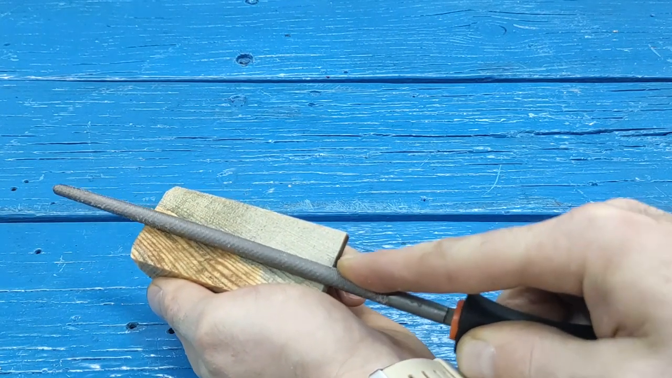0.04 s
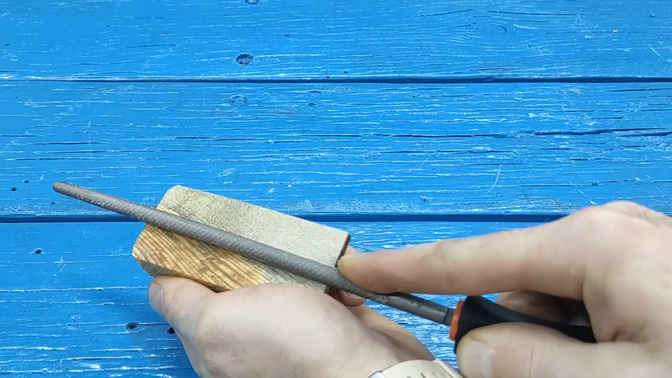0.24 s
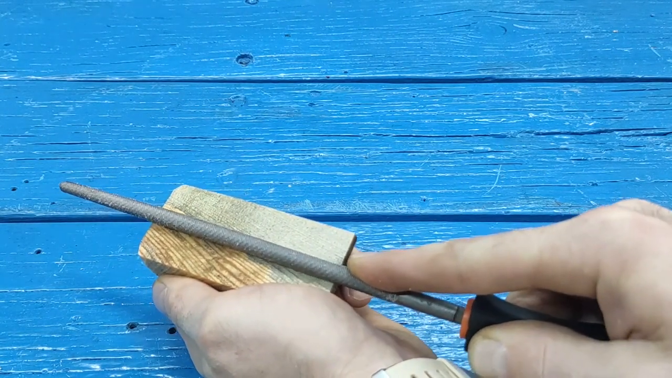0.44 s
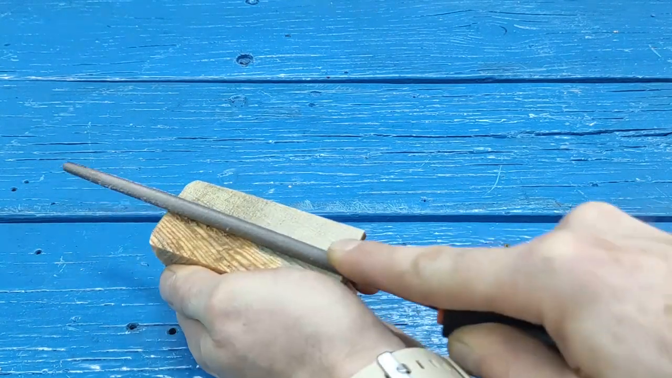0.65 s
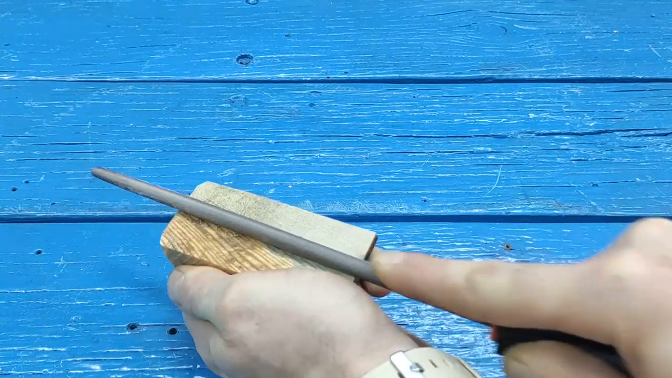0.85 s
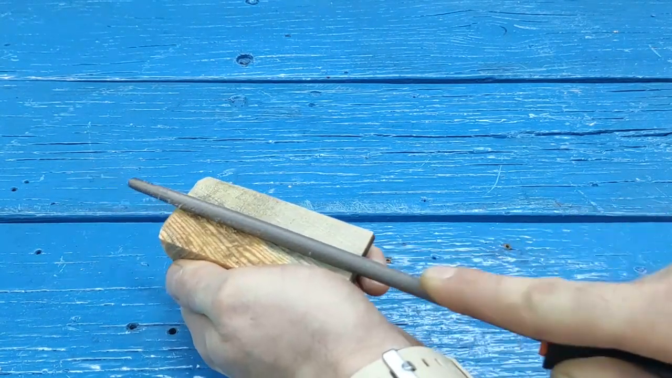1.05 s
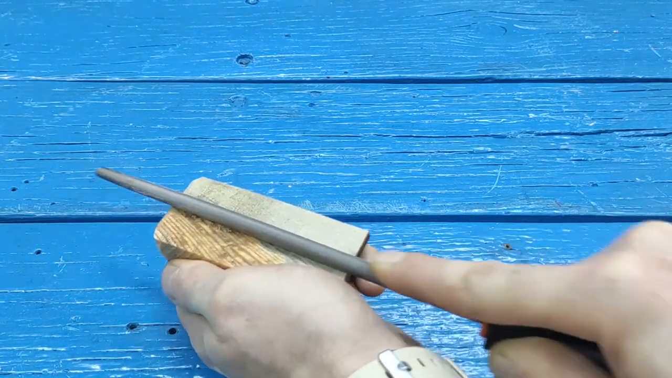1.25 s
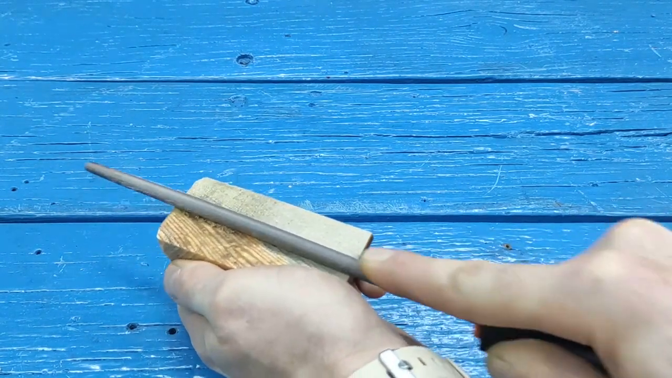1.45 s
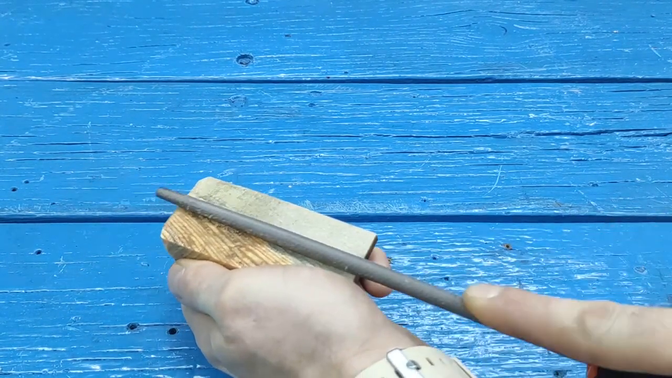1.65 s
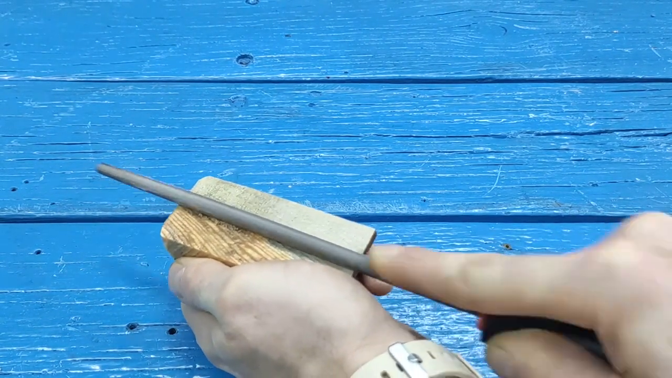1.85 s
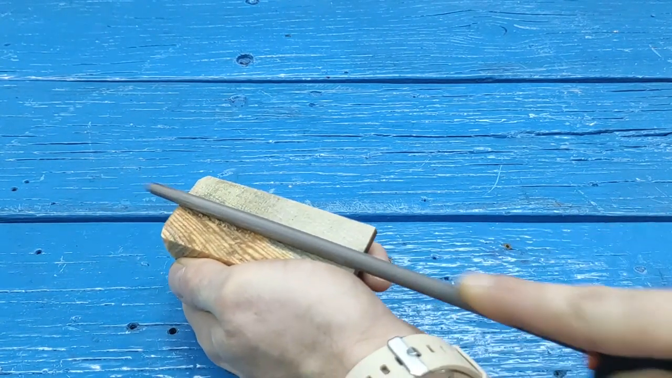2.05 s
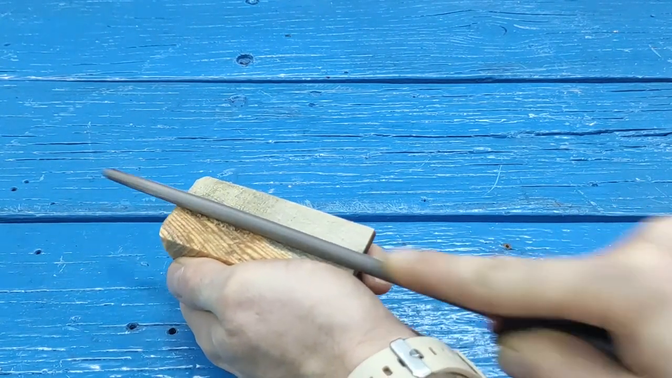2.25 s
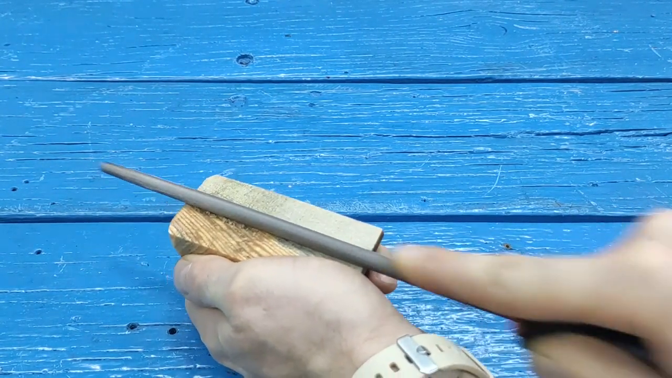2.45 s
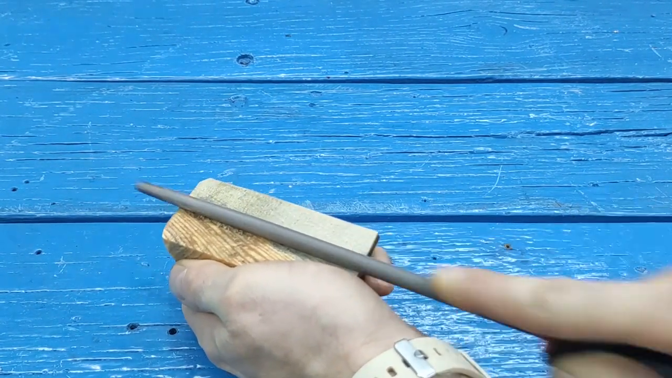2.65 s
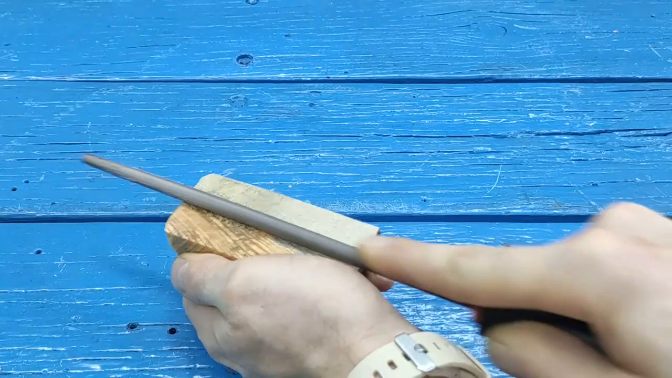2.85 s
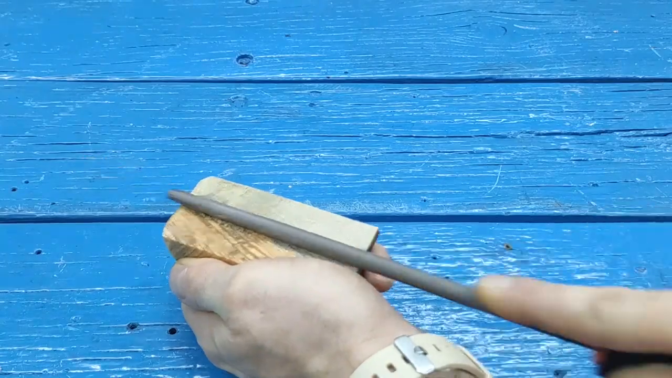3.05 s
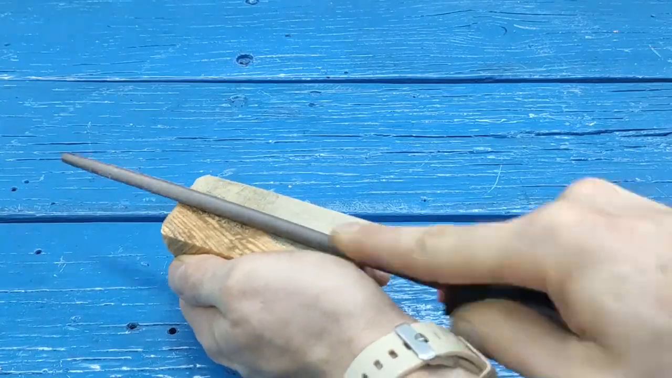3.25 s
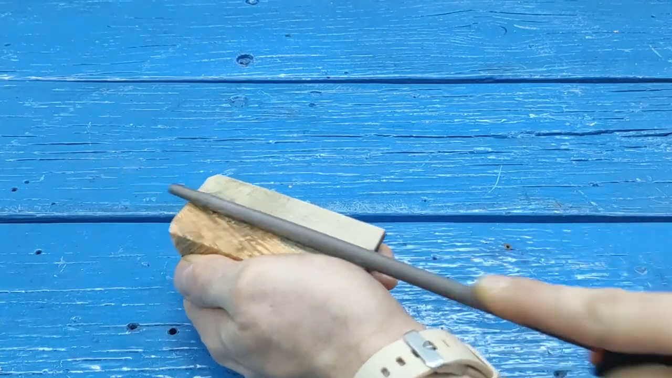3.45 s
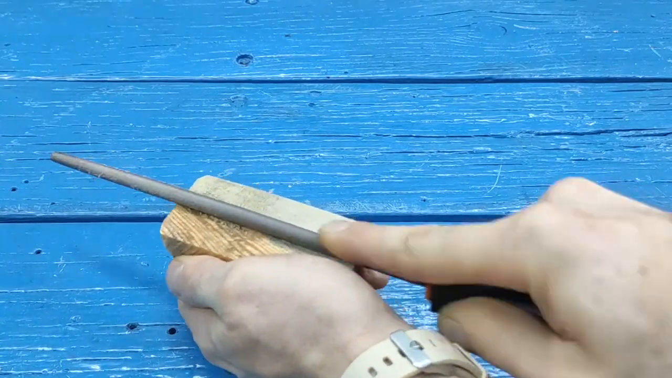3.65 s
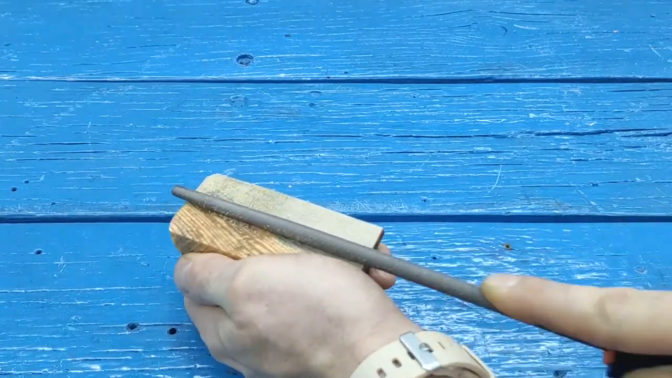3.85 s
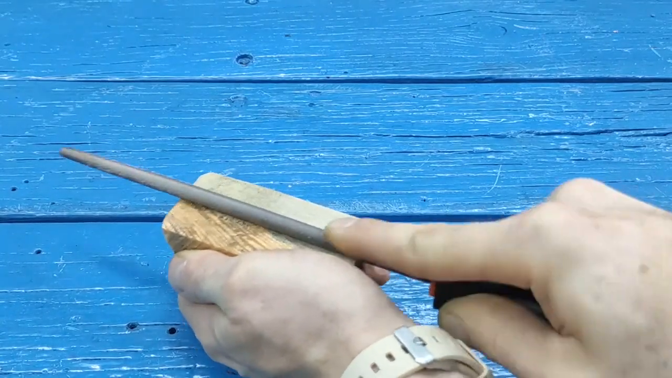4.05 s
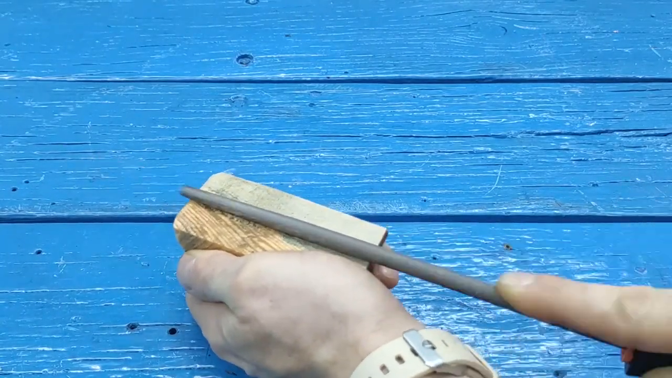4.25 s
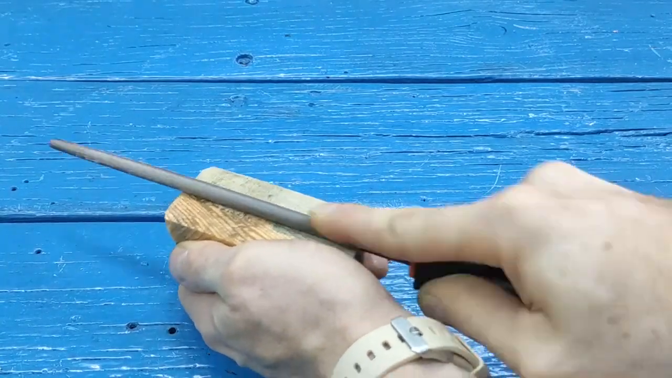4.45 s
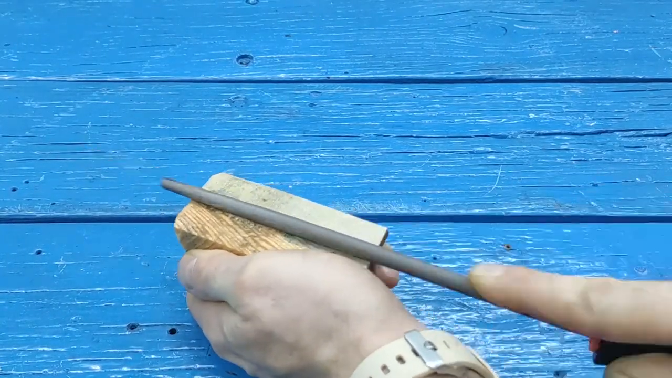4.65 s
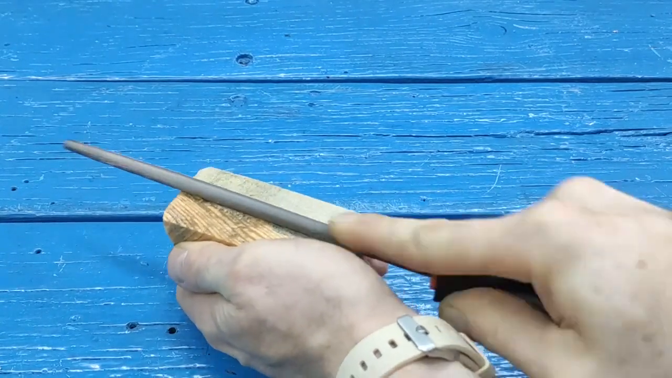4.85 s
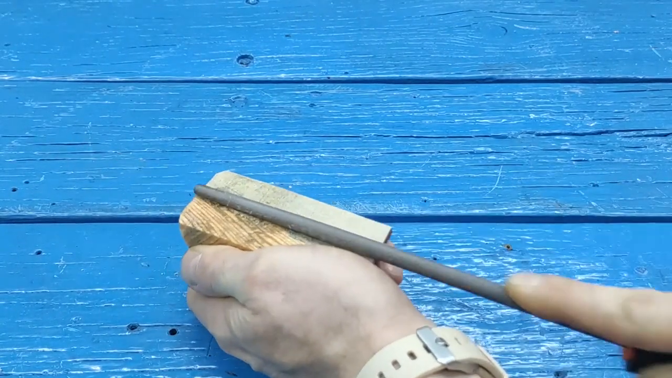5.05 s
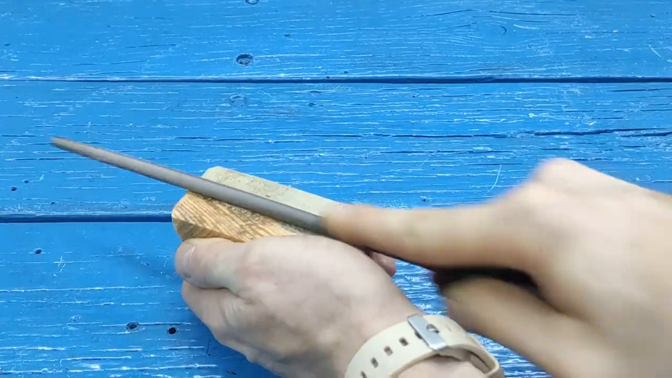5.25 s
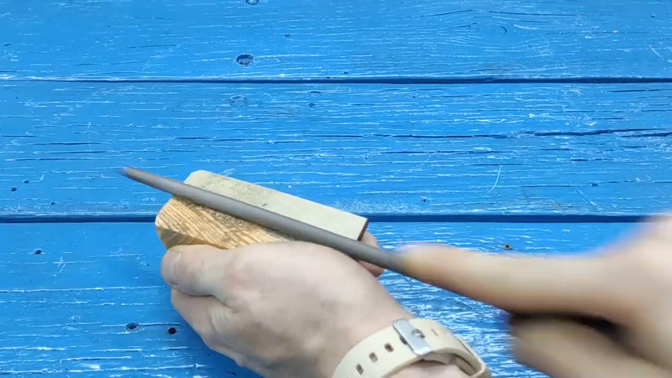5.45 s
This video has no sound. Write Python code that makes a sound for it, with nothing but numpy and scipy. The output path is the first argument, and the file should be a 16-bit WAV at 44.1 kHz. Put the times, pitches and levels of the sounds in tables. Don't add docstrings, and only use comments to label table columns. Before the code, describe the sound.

The first half second is nearly silent: at about 0.1 s a thin, bright steel click and short slide on wood, at 0.2 s a compact woody knock, and near 0.47 s a tiny gritty tick. From about 0.57 s a round file rasps on a hand-held wooden block. The first strokes are hesitant and jerky, about six cycles a second, with weaker pulls and clearly louder pushes. A dull low thump falls at 1.6 s. By 2 s the filing is smooth and regular, just over seven cycles a second. From roughly 2.4 s a rough, arching tooth tone, rising and falling with hand speed, colours many strokes. The rasp is strongest from 4 s and continues to the cut-off at 5.5 s. Low jolts mark every turn, with palm rub and hand rumble beneath. The sound is close, stereo and dry, with faint air noise and short room decay.

```python
import sys
import numpy as np
from scipy import signal
from scipy.fft import rfft, irfft, next_fast_len
from scipy.io import wavfile
from scipy.ndimage import uniform_filter1d, map_coordinates

SR = 44100
rng = np.random.default_rng(int(sys.argv[2]) if len(sys.argv) > 2 else 0)


def waveform_to_disk(signal):
    frames = np.transpose(np.atleast_2d(signal))
    scaled = np.clip(frames, -1, 1) * 32767
    samples = np.round(scaled).astype(np.int16)
    wavfile.write(sys.argv[1], SR, samples)


def voltage_ratio(level):
    return 10 ** (np.asarray(level, float) / 20)


N = 242991

# hz, level_db_per_hz
AIR_TONE = [(25, 5), (60, -12), (200, -29), (600, -16.5), (2000, -22.5), (5000, -21), (8000, -16.5),
            (12000, -13.5), (15800, -17.5)]
# time_s, level_db
AIR_LEVEL = [(0, -92), (.06, -89.5), (.12, -86), (.24, -80), (.3, -90.5), (.45, -91), (.5, -86.5),
             (.6, -78), (5.51, -64.5)]
# hz, t60_s
ROOM_DECAY = [(300, 0.92), (3000, 0.27), (12000, 0.13)]
# hz, likeness_0_1
PORT_LIKENESS = [(60, 0.75), (130, 0.65), (290, 0.63), (640, 0.29), (1410, 0.73), (3100, 0.767),
                 (4700, 0.74), (6820, 0.997), (15000, 0.49)]
# hz, left_minus_right_db
PORT_LEAN = [(60, 6), (110, -1.5), (200, 0.5), (380, -1.5), (700, 2), (1290, -3.5), (2380, -2),
             (4400, -2.5), (8120, -4), (15000, -1)]
# hz, lead_rad
PORT_LEAD = [(0, 0.27), (1550, -0.493), (2580, -0.88), (3360, -0.87), (3790, -1.16), (5250, 1.46),
             (6980, 0.84), (15600, -0.19)]

# hz, level_db_per_hz
HANDS_TONE = [(15, -6), (28, 3.5), (60, -6), (150, -4.5), (240, -12), (283, -10.5), (360, -19), (500, -44),
              (800, -53)]
# hz, level_db_per_hz
PALM_TONE = [(250, -24), (400, -8.5), (700, -3.5), (1150, 3.5), (1500, -1), (2000, -43)]
# time_s, level_db
STILL_HANDS = [(0.0, -82), (0.18, -99), (0.21, -88), (0.41, -109), (0.6, -89)]
# time_s, level_db
PALM_SETTLES = [(0, -86.5), (.06, -93), (.1, -104), (.45, -110)]
# peak_s, rumble_db, palm_db
GRIP_SHIFTS = [(0.591, -81, -76.5), (0.681, -78, -65.5), (.86, -82, -72.5), (1.1, -87, -76.5),
               (1.18, -83.5, -65.5), (1.33, -72.5, -71), (1.49, -84, -71), (1.56, -80, -73),
               (1.63, -65, -65.5), (2.34, -75, -72), (2.48, -69, -74.5), (3.33, -63.5, -89),
               (3.58, -71, -66), (3.69, -77, -77), (4.08, -65, -66), (4.36, -60.5, -69), (5.22, -74, -85.5),
               (5.28, -75.5, -85.5)]
# time_s, level_db
EFFORT = [(0.57, -35), (0.645, -27), (0.733, -8), (1.2, -5), (1.5, -6), (2.0, -1.5), (2.9, -0.58),
          (3.5, -1.5), (3.9, 4), (4.6, 1.48), (5.5, 3)]

# hz, level_db_per_hz
SLIDE_TONE = [(1500, -45), (2500, -25), (4500, -12), (6700, 0.5), (8500, -7.5), (12500, -31), (15000, -4),
              (15900, 1)]
# peak_s, peak_db, rise_s, fall_s (20 dB)
SLIDES = [
    (.112, -52.5, .022, .03),
    (.15, -83, .03, .12),
    (.216, -83, .02, 0.1),
    (.474, -87, .018, 0.64),
]
# start_s, peak_db, pitch_hz, t60_s, blur_hz
TAPS = [(.108, -59, 6720, 0.13, 60), (.085, -66, 15200, .15, 500), (0.214, -40.5, 684, 0.035, 1),
        (.193, -74, 700, 0.1, 40), (.1, -84, 520, 0.18, 20), (.216, -69, 12300, .06, 1800),
        (.245, -67.5, 700, 0.071, 15), (.472, -62, 12000, .006, 1900), (1.164, -51, 166, 0.052, 3),
        (1.32, -64, 150, .06, 12), (1.612, -38.5, 154, 0.072, 3), (2.2, -56.5, 410, .05, 12)]

# pull_s, push_s, pull_db, push_db
CYCLES = [(0.567, 0.661, -51, -43.5), (0.74, 0.827, -50.5, -44), (0.905, 0.988, -49, -41.5),
          (1.063, 1.14, -46.5, -41), (1.221, 1.296, -44, -39.5), (1.368, 1.454, -48, -39),
          (1.521, 1.609, -45.5, -38.5), (1.676, 1.748, -45, -37.5), (1.823, 1.892, -45, -37),
          (1.958, 2.02, -45, -37.5),
          (2.091, 2.156, -45, -36.5), (2.232, 2.297, -44, -35.5), (2.37, 2.44, -46, -35.5),
               (2.514, 2.579, -44.5, -36), (2.648, 2.715, -45.5, -35), (2.787, 2.852, -47, -36),
               (2.924, 2.989, -45, -37), (3.061, 3.129, -43, -36), (3.199, 3.264, -44, -35.5),
               (3.338, 3.401, -42, -35.5), (3.47, 3.53, -44, -35), (3.601, 3.666, -43, -34.5),
               (3.736, 3.806, -44.5, -35), (3.876, 3.939, -43, -33.5), (4.013, 4.076, -40.5, -31),
               (4.147, 4.211, -41, -29), (4.284, 4.342, -40.5, -31.5), (4.414, 4.476, -40, -32),
               (4.546, 4.612, -42.5, -31.5), (4.678, 4.744, -40.5, -32), (4.814, 4.874, -38.5, -32.5),
               (4.945, 5.003, -39.5, -32.5), (5.078, 5.134, -38.5, -30), (5.203, 5.262, -40.5, -31.5),
               (5.329, 5.388, -40, -32), (5.451, 5.516, -39.5, -33)]
# time_s, pull_jerkiness, push_jerkiness, pull_top_speed_place_0_1, push_top_speed_place_0_1
MOTION = [(0.56, 6.8, 6.3, 0.35, 0.33), (0.8, 3.8, 4.4, 0.52, 0.42), (1.1, 4.9, 5, 0.44, 0.47),
          (1.38, 5.5, 3.9, .47, 0.48), (1.7, 2.9, 3.4, 0.42, 0.46), (2.05, 1.01, 2.3, 0.46, .48),
          (2.6, 1.3, 2.66, 0.48, 0.49), (3.4, 1.1, 1.93, 0.45, 0.53), (3.9, 1.2, 2.04, .49, .52),
          (4.22, 1.2, 3.66, 0.49, 0.45), (4.38, 1.32, 1.6, 0.44, 0.52), (5.5, 0.95, 1.96, 0.37, 0.49)]
# time_s, level_db
FREE_STEEL = [(0.56, -9), (0.75, 4), (1.0, -6), (1.13, -12), (1.37, 8.5), (1.68, 2.5), (2.0, 5),
              (2.12, -5.5), (2.43, 7), (2.75, 8.5), (3.0, 7), (3.27, 7.5), (3.45, -5), (3.68, -4), (3.8, 2),
              (4.2, -10), (4.5, -10.5), (5.3, 7.5)]
# start_s, top_rate_hz, level_re_stroke_db
EVEN_TEETH = [(2.373, 2700, -15), (2.438, 2770, -20), (2.577, 3010, -31.5), (2.989, 3270, -14.5),
              (3.128, 3430, -22), (3.338, 2680, -15), (3.471, 2557, -13.5), (3.531, 1994, -15),
              (3.602, 2035, -29), (3.665, 2218, -11), (3.738, 2102, -13), (3.804, 2044, -19.5),
              (3.875, 2071, -12.5), (3.938, 2282, -18), (4.012, 2417, -8), (4.076, 2435, -8.5),
              (4.148, 2460, -10), (4.21, 2660, -15), (4.475, 2650, -24.5), (4.609, 2868, -18.5),
              (4.741, 3180, -21.5), (4.812, 2950, -15), (4.876, 2583, -15), (4.945, 2667, -20.5),
              (5.003, 3037, -14), (5.134, 3394, -26.5), (5.386, 3000, -29.5)]
# hz, level_db_per_hz
PULL_TONE = [(240, -39), (400, -57), (1020, -28), (1480, -12), (2460, 1.5), (3240, -1), (3840, 3),
             (5300, -1.5), (6680, -13), (7670, -4.5), (8410, -11.5), (10100, -8), (11600, -14.5),
             (13100, -3), (15800, -15)]
# hz, level_db_per_hz
PUSH_TONE = [(240, -52.5), (400, -29), (837, -37), (1650, -22), (2610, -4), (3090, -2.5), (3900, -1.5),
             (4270, -6), (5220, -4), (6090, -12), (7790, -6), (8670, -9), (11600, -12), (13800, -7),
             (15800, -12)]
# pitch_hz, width_hz, level_re_fibres_db
BODY_MODES = [(1505, 50, 0), (2430, 90, -6), (3835, 90, 1), (4100, 130, -4), (5180, 200, -6),
              (7750, 220, -5), (9880, 250, -7)]

RUMBLE_DB, RUMBLE_PER_EFFORT_DB = -73, 0.62
PALM_DB, PALM_PER_EFFORT_DB = -73, 0.336
SHIFT_RISE_S, SHIFT_FALL_S = 0.024, 0.036
BLOCK_HZ, BLOCK_WIDTH_HZ, BLOCK_DB = 281, 12, 5
KNOCK_PAN_DB, TICK_PAN_DB = 4.5, 1
JOLT_DB, JOLT_SCATTER_DB = -41.5, 2.5
JOLT_LAG_S = (0.0023, 0.0071)
TREBLE_DB, TREBLE_LOSS_DB = (-2.5, -5), (0.5, 1.19)
STEEL_MODE = 2


def unit(x):
    return x / np.sqrt(np.mean(x ** 2) + 1e-20)


def along(points, hz):
    f, v = np.transpose(points)
    return np.interp(np.log(hz + 1), np.log(f + 1), v)


def curve(rows):
    return np.interp(np.arange(N) / SR, *np.transpose(rows))


def wobble(rate_hz):
    knots = rng.standard_normal(int(N * rate_hz / SR) + 4)
    return map_coordinates(knots, [np.arange(N) * rate_hz / SR])


def swells(rows):
    t = np.arange(N) / SR
    return sum(voltage_ratio(db - 20 * np.maximum((s - t) / rise_s, (t - s) / fall_s)) for s, db, rise_s, fall_s in rows)


def filtered(x, response):
    m = next_fast_len(N + SR // 2)
    return irfft(rfft(x, m) * response(np.fft.rfftfreq(m, 1 / SR)), m)[..., :N]


def ringing(x, hz, width_hz):
    b, a = signal.iirpeak(hz, hz / width_hz, SR)
    return signal.lfilter(b, a, x)


def noise(tone):
    return unit(filtered(rng.standard_normal((2, N)), lambda hz: voltage_ratio(along(tone, hz))))


def patchy(x, depth_db):
    z = signal.stft(x, nperseg=256)[2]
    field = uniform_filter1d(rng.standard_normal(z.shape[-2:]), size=2, axis=0)
    field = uniform_filter1d(field, size=4, axis=1)
    return signal.istft(z * voltage_ratio(depth_db * unit(field)), nperseg=256)[1][..., :N]


def ports(pair):
    def turn(hz):
        return np.arccos(np.clip(along(PORT_LIKENESS, hz), 0, 1)) / 2

    def half(hz):
        return voltage_ratio(along(PORT_LEAN, hz) / 2) * np.exp(0.5j * along(PORT_LEAD, hz))

    mid, side = filtered(pair, lambda hz: np.array([np.cos(turn(hz)), np.sin(turn(hz))]))
    return filtered(np.array([mid + side, mid - side]), lambda hz: np.array([half(hz), 1 / half(hz)]))


def air():
    return voltage_ratio(curve(AIR_LEVEL)) * ports(patchy(noise(AIR_TONE), depth_db=3.5))


def shop(x):
    hz, t, z = signal.stft(rng.standard_normal((2, SR // 3)), SR, nperseg=256)
    decay = voltage_ratio(-60 * t / along(ROOM_DECAY, hz)[:, None])
    tail = signal.istft(z * decay, SR, nperseg=256)[1]
    late = np.pad(x, ((0, 0), (300, 0)))
    return signal.fftconvolve(late, tail / np.linalg.norm(tail[0]), axes=1)[:, :N]


def strokes():
    cycles = np.array(CYCLES)
    start, db = cycles[:, :2].ravel(), cycles[:, 2:].ravel()
    way = np.arange(len(start)) % 2
    s, *motion = np.transpose(MOTION)
    pull_jerk, push_jerk, pull_top, push_top = [np.interp(start, s, column) for column in motion]
    jerk = np.choose(way, [pull_jerk, push_jerk])
    top = np.choose(way, [pull_top, push_top])
    treble_db = np.take(TREBLE_DB, way) - np.take(TREBLE_LOSS_DB, way) * jerk
    steel_db = np.interp(start, *np.transpose(FREE_STEEL))
    return np.array([start, db, top, jerk, treble_db, steel_db])


def hand():
    start, _, top = strokes()[:3]
    count = np.interp(np.arange(N) / SR, start, np.arange(len(start)))
    index = np.minimum(count.astype(int), len(start) - 2)
    skew = np.log(0.5) / np.log(np.clip(top, 0.2, 0.8)[index])
    phase = np.clip(count - index, 0, 1) ** skew
    return index, np.abs(np.sin(np.pi * phase))


def grip(moving):
    effort_db = curve(EFFORT)
    rumble_shift, palm_shift = [
        swells([(row[0], row[k], SHIFT_RISE_S, SHIFT_FALL_S) for row in GRIP_SHIFTS]) for k in (1, 2)]
    rumble = np.where(moving, voltage_ratio(RUMBLE_DB + RUMBLE_PER_EFFORT_DB * effort_db), voltage_ratio(curve(STILL_HANDS)))
    palm = np.where(moving, voltage_ratio(PALM_DB + PALM_PER_EFFORT_DB * effort_db), voltage_ratio(curve(PALM_SETTLES)))
    return rumble + rumble_shift, palm + palm_shift


def hands(index, speed):
    rumble_gain, palm_gain = grip(index > 0)
    rumble = rumble_gain * voltage_ratio(-1.5 + 3.7 * wobble(25.11) + 2.2 * speed) * noise(HANDS_TONE)
    rumble = rumble + voltage_ratio(BLOCK_DB) * ringing(rumble, BLOCK_HZ, BLOCK_WIDTH_HZ)
    palm = palm_gain * voltage_ratio(-4 + 3.33 * speed) * patchy(noise(PALM_TONE), depth_db=4)
    return rumble + palm


def steel_slides():
    return swells(SLIDES) * patchy(noise(SLIDE_TONE), depth_db=3)


def taps():
    out, t = np.zeros((2, N)), np.arange(SR // 4) / SR
    for s, db, hz, t60_s, blur_hz in TAPS:
        pan_db = KNOCK_PAN_DB if hz < 2000 else TICK_PAN_DB
        wander = map_coordinates(rng.standard_normal(4000), [t * np.clip(3 * blur_hz, 1, 15000)])
        turns = 2 * np.pi * np.cumsum(hz + blur_hz * wander) / SR
        swell = 1 - np.exp(-(t * hz / 2) ** 2)
        ring = np.sin(turns) * voltage_ratio(-60 * t / t60_s) * swell
        i = round(s * SR)
        out[:, i:i + len(t)] += voltage_ratio(db + pan_db * np.array([[0.5], [-0.5]])) * ring
    return out


def jolts():
    lead = SR // 20
    out, t = np.zeros((2, N + SR)), np.arange(-lead, lead) / SR
    relax = np.where(t < 0, 0.7 * np.exp(t / 0.01), np.exp(-t / 0.014))
    swing = np.tanh(t / 0.0041) * relax
    for k, start in enumerate(strokes()[0]):
        effort_db = np.interp(start, *np.transpose(EFFORT))
        db = JOLT_DB + effort_db + JOLT_SCATTER_DB * rng.standard_normal((2, 1))
        i = round((start + JOLT_LAG_S[k % 2]) * SR)
        out[:, i:i + len(t)] += (-1) ** k * voltage_ratio(db - 6) * swing
    corner_hz = np.array([[14], [32]])
    swayed = filtered(out[:, lead:][:, :N], lambda hz: hz ** 2 / (hz ** 2 + corner_hz ** 2))
    return swayed * voltage_ratio([[2], [-1.5]])


def teeth(index, speed):
    start, stroke_db = strokes()[:2]
    rate_hz, gain = np.zeros((2, len(start)))
    for s, hz, db in EVEN_TEETH:
        k = np.argmin(np.abs(start - s))
        rate_hz[k], gain[k] = hz, voltage_ratio(stroke_db[k] + db + 11.5)
    turns = 2 * np.pi * np.cumsum(rate_hz[index] * speed * (1 + 0.02456 * wobble(400))) / SR
    tone = np.sin(turns) + 0.198 * np.sin(2 * turns) + 0.023 * np.sin(3 * turns)
    tone = tone * gain[index] * speed ** 8 * voltage_ratio(2.5 * wobble(150))
    tone = filtered(tone, lambda f: 1 / (1 + (1800 / (f + 1)) ** 6))
    return np.array([tone, -0.6 * tone])


def fibre_drive(speed, snaps_hz, spread_db, smooth):
    when, how_big, sign = rng.random((3, 2, N))
    size = voltage_ratio(np.minimum(-spread_db * np.log(how_big + 1e-4), 13)) * np.sign(sign - 0.5)
    snaps = (when < snaps_hz * (0.2 + speed) / SR) * size
    return unit(unit(snaps) + smooth * rng.standard_normal((2, N)))


def fibres(index, speed):
    _, db, _, jerk, treble_db, steel_db = strokes()[:, index]
    threshold = 0.27 + 0.045 * jerk
    bite = speed ** (0.85 * jerk) / (1 + (threshold / (speed + 1e-3)) ** 5)
    slide = 0.13 * np.where(index > 0, (speed + 0.019) ** 0.0167, speed)
    level = voltage_ratio(db - 3 + 0.65 * wobble(60) + 0.2 * wobble(200))
    drive = fibre_drive(speed, snaps_hz=4923, spread_db=1.5, smooth=1.762) * level * (bite + slide)
    hz = np.linspace(0, SR / 2, num=2048)
    torn = 0
    for way, tone in enumerate([PULL_TONE, PUSH_TONE]):
        norm = np.sqrt(np.mean(voltage_ratio(2 * along(tone, hz))))
        torn = torn + filtered(drive * (index % 2 == way), lambda f: voltage_ratio(along(tone, f)) / norm)
    treble = filtered(torn, lambda f: 1 / (1 + (6000 / (f + 1)) ** 8))
    out = torn + treble * (voltage_ratio(treble_db + 2 + 5.1 * (1 - speed)) - 1)
    strength_db = 1.37 * rng.standard_normal((index.max() + 1, len(BODY_MODES)))
    for k, (mode_hz, width_hz, mode_db) in enumerate(BODY_MODES):
        ring_db = mode_db + 0.8 * wobble(70) + strength_db[index, k] + steel_db * (k == STEEL_MODE)
        out = out + ringing(torn * np.sqrt(speed) * voltage_ratio(ring_db), mode_hz, width_hz)
    return patchy(out, depth_db=2.4)


def scene():
    index, speed = hand()
    rasp = fibres(index, speed) + teeth(index, speed)
    near = ports(rasp + steel_slides() + hands(index, speed))
    room = voltage_ratio([[-15], [-13.5]]) * shop(near)
    return air() + room + taps() + jolts() + near


def band_limit(x):
    return signal.sosfilt(signal.butter(12, 16010, fs=SR, output="sos"), x)


def record(dry):
    kept = filtered(dry, lambda hz: hz < 15760)
    return band_limit(kept)


dry = scene()
out = record(dry)
waveform_to_disk(out)
```